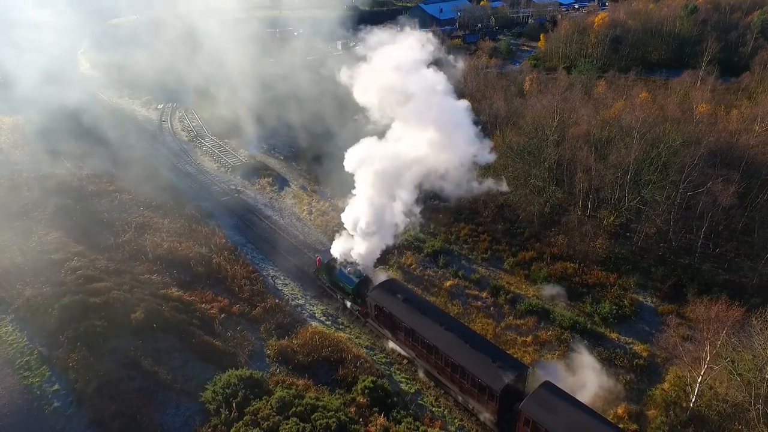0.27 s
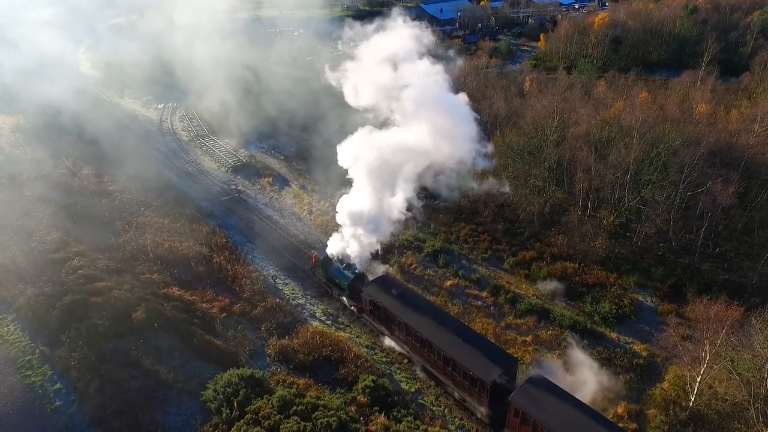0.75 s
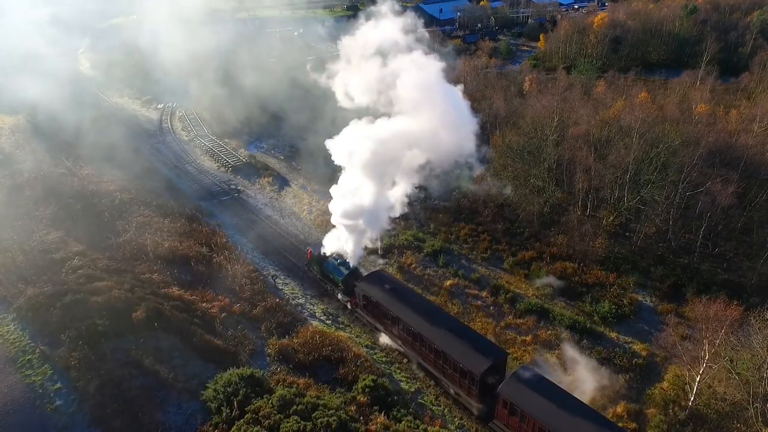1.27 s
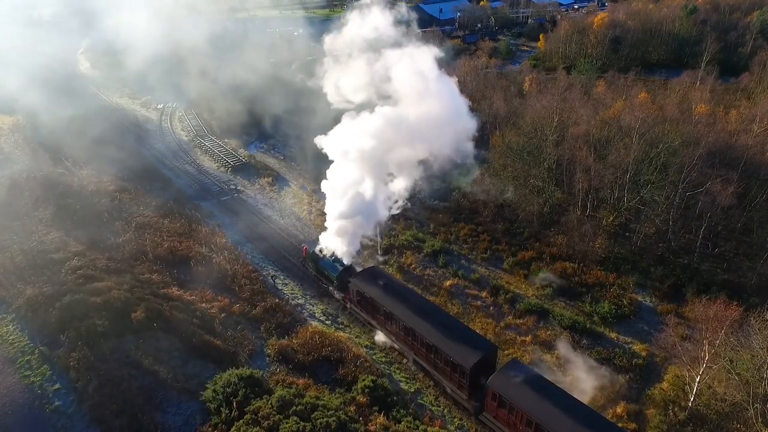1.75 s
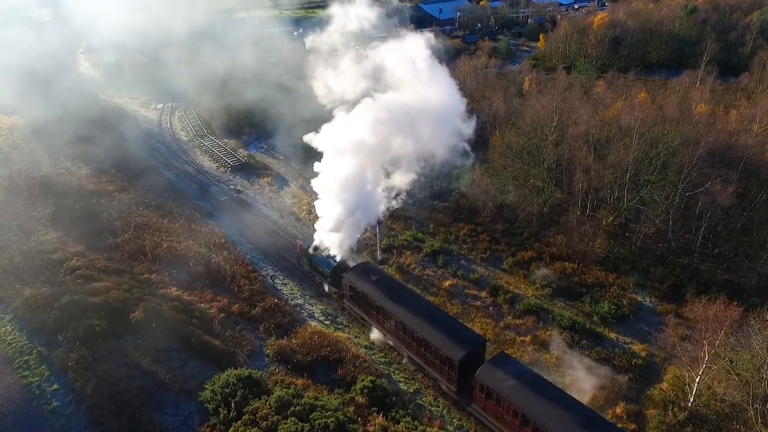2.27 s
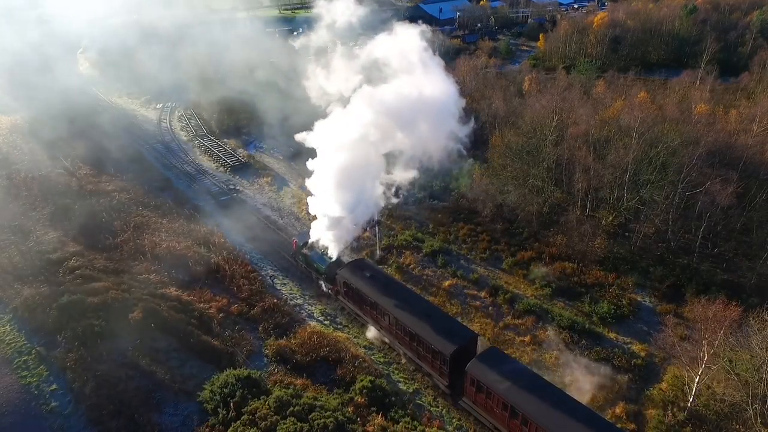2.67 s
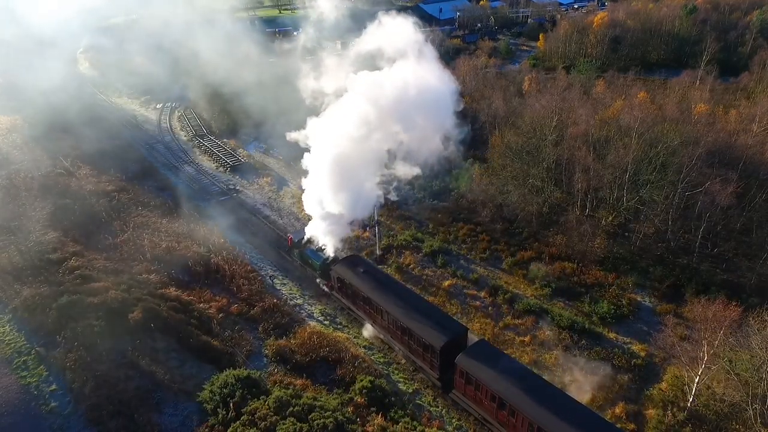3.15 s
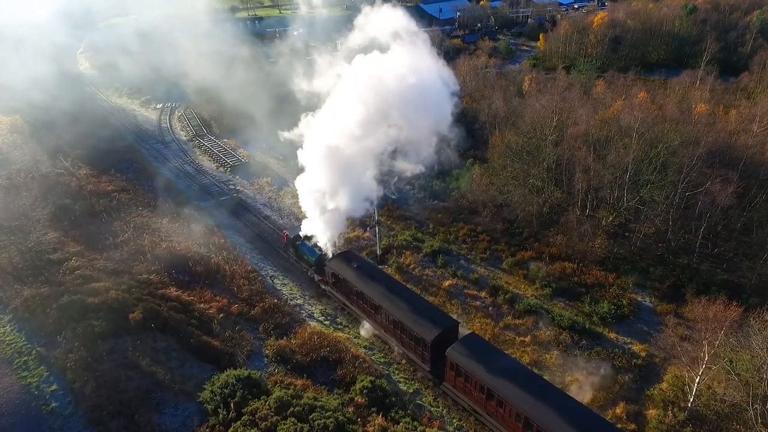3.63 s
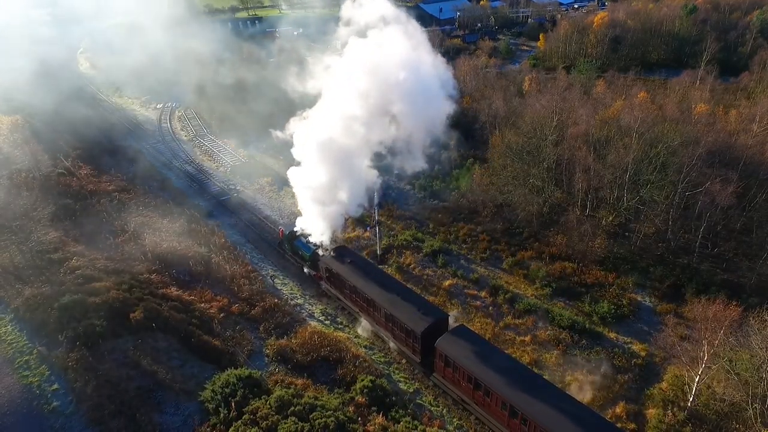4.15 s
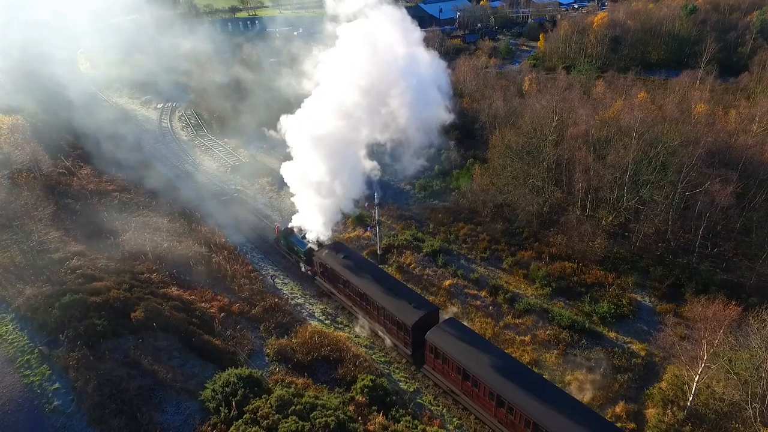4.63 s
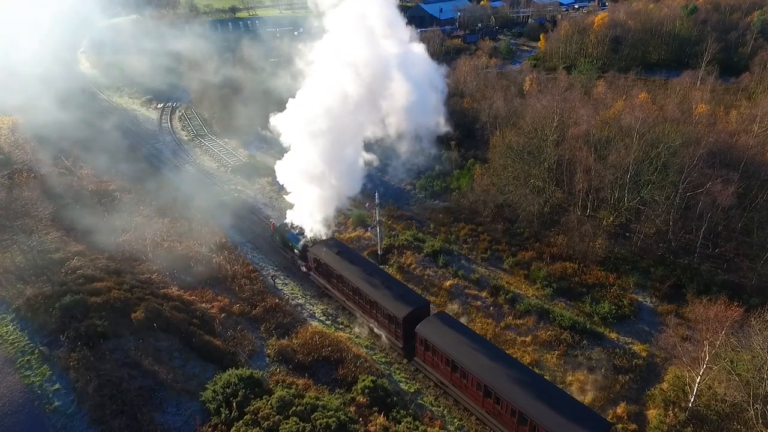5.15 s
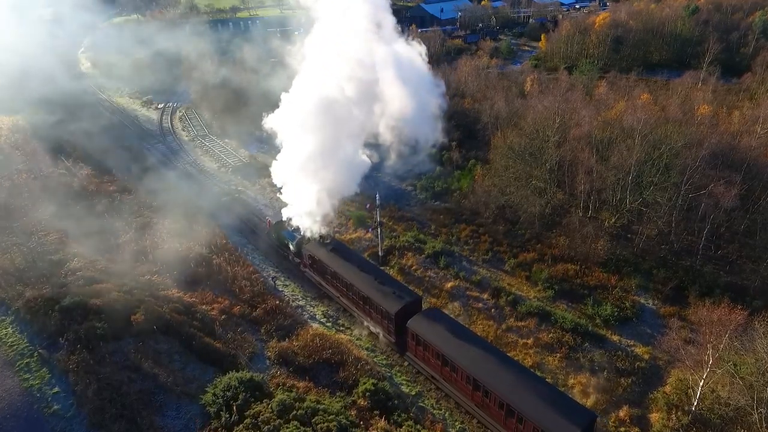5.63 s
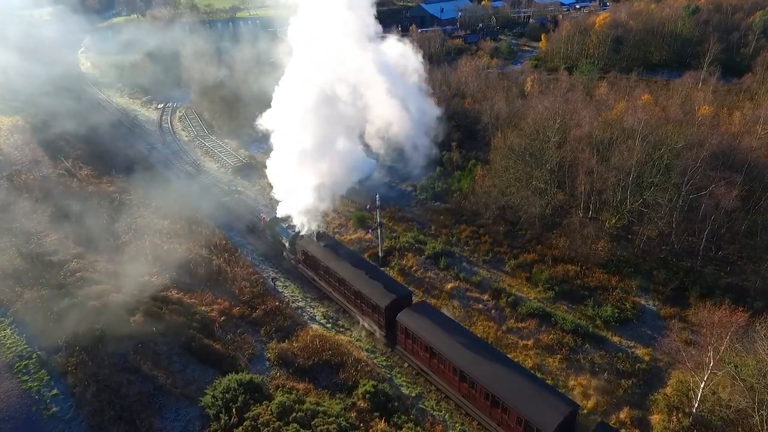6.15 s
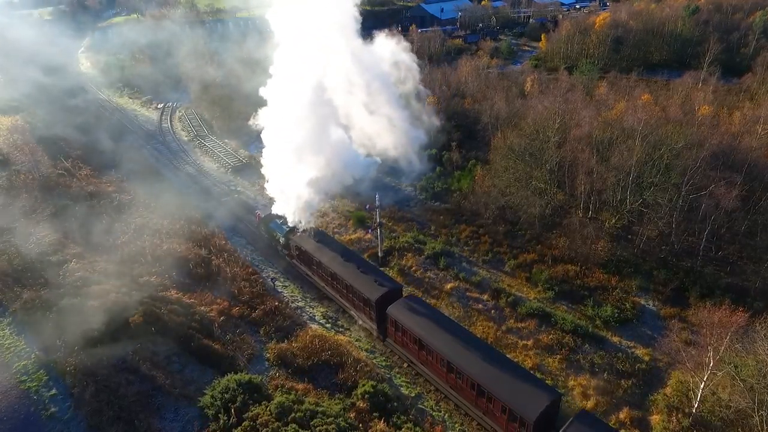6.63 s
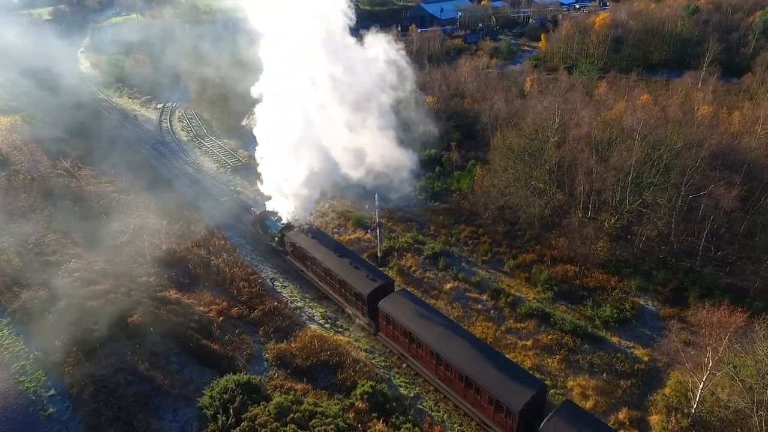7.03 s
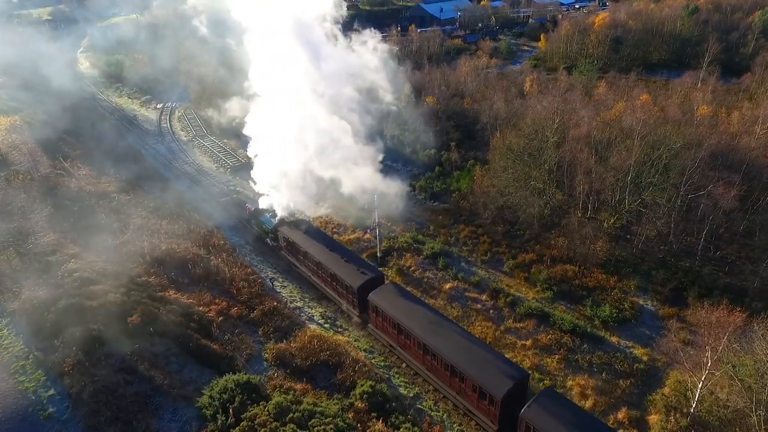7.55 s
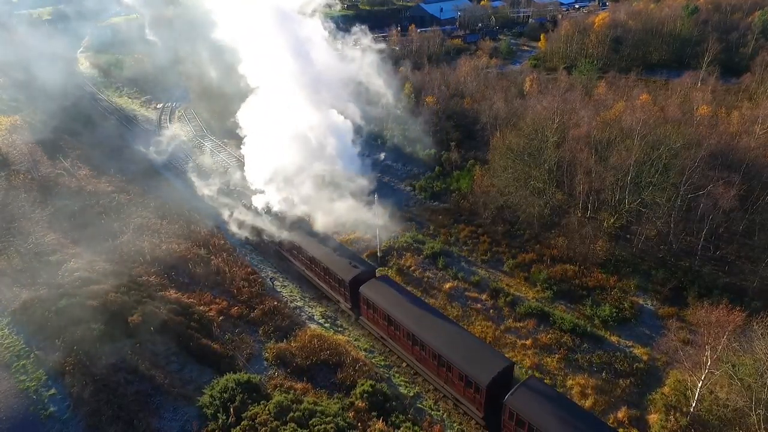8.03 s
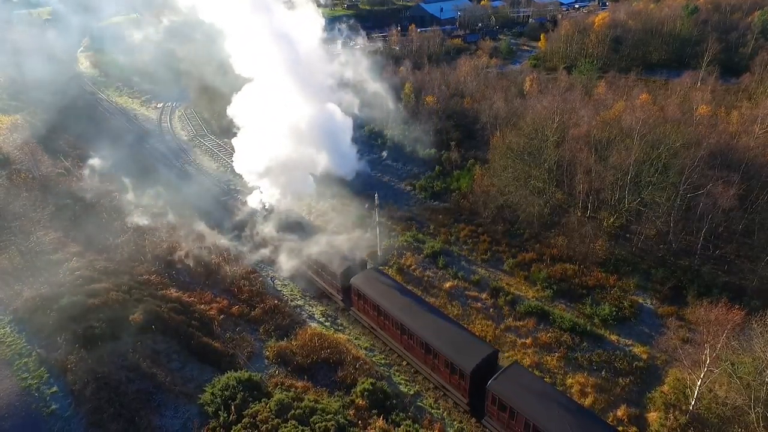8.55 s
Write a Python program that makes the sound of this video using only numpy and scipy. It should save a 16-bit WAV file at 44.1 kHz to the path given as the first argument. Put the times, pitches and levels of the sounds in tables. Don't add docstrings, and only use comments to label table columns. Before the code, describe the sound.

A steam locomotive chuffs in deep, husky beats that quicken gradually and soften, over low rolling rumble, faint whistling steam hiss and occasional dull metal knocks.

```python
import sys
import numpy as np
from scipy import signal
from scipy.io import wavfile
from scipy.ndimage import uniform_filter1d, map_coordinates

SR = 44100
rng = np.random.default_rng(int(sys.argv[2]) if len(sys.argv) > 2 else 0)


def magnitude_from_level(level_db):
    exponent = np.asarray(level_db, float) / 20
    return 10 ** exponent


def file_out(sig):
    cols = np.atleast_2d(sig).T
    lim = np.clip(cols, -1, 1)
    pcm = np.round(lim * 32767).astype(np.int16)
    wavfile.write(sys.argv[1], SR, pcm)


N = 387638

# (valve opens t/s, dying time/s, first chimney mode level/dB, second mode level/dB, bark level/dB)
BEATS = [(0.362, 0.073, -18, -22, -18), (.834, .11, -18.5, -20.5, -22.5), (1.346, .1, -17.5, -17, -20.5),
         (1.805, 0.093, -21, -21, -22.5), (2.266, 0.074, -16.5, -19, -19), (2.678, 0.11, -20.5, -19.5, -21),
         (3.14, 0.13, -20, -24, -19), (3.552, 0.088, -22, -22.5, -21), (3.981, 0.093, -18.5, -22, -15.5),
         (4.359, 0.085, -18.5, -21.5, -18.5), (4.779, 0.1, -16.5, -21, -18),
         (5.164, 0.082, -17.5, -39, -19.5), (5.549, 0.086, -19.5, -22, -17.5), (5.9, 0.08, -16.5, -19, -21),
         (6.284, 0.081, -21.5, -20, -21), (6.635, .08, -21, -21, -23), (7.002, 0.084, -20, -18, -21.5),
         (7.329, 0.076, -21, -19.5, -23.5), (7.688, 0.097, -23, -20.5, -21),
         (8.028, 0.086, -25.5, -22, -22.5), (8.364, 0.088, -23, -22.5, -22),
         (8.681, 0.072, -25, -25, -23.5)]


def rms_one(x):
    return x / np.sqrt(np.mean(x ** 2) + 1e-20)


def in_time(rows, t):
    s, *columns = np.transpose(rows)
    return [np.interp(t, s, c) for c in columns]


def at_hz(points, hz):
    f, db = np.transpose(points)
    return np.interp(np.log(hz + 1), np.log(f), db)


def resonate(x, hz, width_hz):
    r = np.exp(-np.pi * width_hz / SR)
    zeros = np.array([1, 0, -1]) * (1 - r * r) / 2
    return signal.lfilter(zeros, [1, -2 * r * np.cos(2 * np.pi * hz / SR), r * r], x)


def body(x, modes, even):
    y = 0
    for hz, width_hz, db in modes:
        once = resonate(x, hz, 1.42 * width_hz)
        y = y + magnitude_from_level(db) * resonate(once, hz, 1.42 * width_hz)
    power = uniform_filter1d(uniform_filter1d(y ** 2, size=1300), size=1300)
    return rms_one(y / (power + 1e-12) ** (even / 2))


def patches(shape, cells, depth_db):
    grid = rng.standard_normal(cells)
    axes = [np.linspace(0, c - 1, n) for c, n in zip(cells, shape)]
    return depth_db * map_coordinates(grid, np.meshgrid(*axes, indexing="ij"), order=1)


def coloured(gain_db):
    hz, s, z = signal.stft(rng.standard_normal(N), SR, nperseg=2048)
    return signal.istft(z * magnitude_from_level(gain_db(hz[:, None], s[None, :])), SR, nperseg=2048)[1][:N]


def steam():
    # (f/Hz, density level/dB)
    hiss = [(560, -15.5), (950, -12.5), (1160, -7.5), (1700, -2), (1920, -6.5), (2200, -4.5), (2480, -10.5),
            (3520, -13.5), (5180, -21), (12600, -36), (15500, -38.5)]
    # (t/s, level/dB, brightness above 7 kHz/dB per octave)
    leak = [(0.0, -36, -0.5), (1.3, -36, 0.5), (2.13, -36, -1), (2.96, -35, -0.7), (3.89, -37.5, 7.7),
            (4.53, -36.5, 3), (5.14, -37, 3.3), (6.22, -36.5, 2.5), (6.73, -38.5, 3), (7.25, -35.5, -3),
            (7.49, -36, -5), (8.79, -36.5, -6)]
    # (middle t/s, length/s, f/Hz, width/Hz, level/dB)
    whistles = [(1.5, 0.79, 1170, 71, 3.5), (3.6, 12, 1338, 77, 3.5), (3.3, 1.4, 1720, 60, 3.5),
                (7.5, 1.7, 2100, 44, 6), (2.8, 1.2, 1890, 37, -9), (3.2, 1.1, 2680, 97, 6),
                (9, 4.5, 2720, 90, 5), (4.28, 1.2, 3160, 340, 5.5), (6.76, 1.05, 3290, 270, 7.5),
                (7.12, 0.8, 3750, 240, 6.5), (8.3, 0.44, 3510, 260, 7), (6.95, 0.78, 5800, 770, 5.5),
                (3.5, 0.66, 4600, 360, 3.5), (4.92, 0.76, 4800, 320, 7.5), (9.2, 2.1, 5500, 100, -6.5),
                (1.3, 1, 6000, 160, 4.5), (4.57, 0.47, 6110, 130, 9), (8.17, 0.57, 5870, 370, 7),
                (4.6, 1.9, 7250, 180, 5.5), (8.33, 0.32, 6900, 430, 8), (2.12, 0.42, 9700, 420, 7.5),
                (4.22, 0.39, 11000, 280, 8), (2.0, 0.54, 13700, 600, 11), (4.53, 0.16, 8600, 300, 7)]
    # (middle t/s, length/s, level/dB)
    valve = [
        (0.83, 0.86, 3.5),
        (2.75, 0.46, 7.5),
        (4.1, 0.89, 7.5),
        (6.2, 1.22, 8),
        (7.95, 0.74, 7),
    ]
    valve_hz, valve_width_hz = 2206, 66
    singing = [(middle, length, valve_hz, valve_width_hz, db) for middle, length, db in valve]

    def gain_db(hz, s):
        level_db, bright_db = in_time(leak, s)
        out = at_hz(hiss, hz) + level_db - level_db.mean()
        out = out + bright_db * np.log2(np.maximum(hz / 7000, 1))
        flutter = 1 + patches(out.shape, (50, 110), depth_db=0.23)
        for middle, length, top_hz, width_hz, db in [*whistles, *singing]:
            away = ((s - middle) / length) ** 4 + abs((hz - top_hz) / width_hz) ** 3
            out = out + db * flutter * np.exp(-away)
        high = np.clip((hz - 2500) / 1500, .25, 1)
        out = out + high * patches(out.shape, (110, 20), depth_db=3.5)
        return out + patches(out.shape, (40, 90), depth_db=1.22)
    return magnitude_from_level(-38.5) * rms_one(coloured(gain_db))


def rolling():
    # (t/s, rumble level/dB)
    rumble = [(0.0, -42.5), (0.49, -44.5), (0.64, -47.5), (0.88, -57), (0.98, -48.5), (2.25, -47),
              (2.4, -50.5), (3.18, -51), (3.28, -42.5), (4.36, -49.5), (5.09, -42.5), (5.7, -50.5),
              (6.49, -42.5), (7.74, -47), (8.37, -41.5), (8.79, -47)]
    # (f/Hz, density level/dB)
    colour = [(22, 1), (40, -12), (70, 9.5), (110, 8.5), (190, 8.5), (300, 6.5), (450, -2), (700, -5.5),
              (1000, -6), (1500, -40.5)]
    upper_db, upper_follows = -39, 0.29

    def gain_db(hz, s):
        deep, = in_time(rumble, s)
        upper = upper_db + upper_follows * (deep - deep.mean())
        share = np.clip(np.log(hz / 250 + 1e-9) / np.log(1.6), 0, 1)
        return at_hz(colour, hz) + (1 - share) * deep + share * upper
    return magnitude_from_level(13.0) * coloured(gain_db)


def surroundings():
    # (f/Hz, density level/dB)
    air = [(25, -30), (60, -13), (170, -10), (450, -12), (800, -10.5), (1050, -11), (2000, -13),
           (3600, -17), (6000, -21.5), (9000, -26), (12000, -32), (13500, -31), (15500, -44)]
    # (f/Hz, width/Hz, level/dB)
    air_modes = [(520, 50, 11.5), (635, 20, 15), (700, 25, 16), (880, 25, 2), (1320, 25, 5),
                 (1480, 110, -16), (1720, 85, 11), (2230, 90, 11), (2740, 80, 2), (3030, 80, 3),
                 (6000, 200, -5)]

    def gain_db(hz, s):
        out = at_hz(air, hz)
        for top_hz, width_hz, db in air_modes:
            out = out + db * np.exp(-((hz - top_hz) / width_hz) ** 2)
        return out + patches((len(hz), s.size), (60, 12), depth_db=-2.5)
    return magnitude_from_level(-50.5) * rms_one(coloured(gain_db)) * [[1], [-1]]


def smokebox(t):
    # (peak level/dB, lag/s, half length/s)
    swells = [(-46, .001, .05), (-49, 0.21, .07), (-45.5, 0.18, 0.11), (-48, 0.16, 0.065), (-43, 0.18, .1),
              (-42, 0.16, 0.13), (-56, .1, .15), (-48, 0.12, .12), (-39, 0.19, 0.11), (-39.5, 0.18, 0.098),
              (-45.5, 0.19, 0.11), (-39, 0.16, 0.096), (-46, .18, .07), (-43.5, 0.18, 0.11),
              (-45, .21, 0.12), (-42, 0.19, .06), (-42.5, .18, 0.14), (-45, 0.22, 0.15), (-65, 0.11, .12),
              (-42, 0.18, 0.15), (-48, 0.28, 0.18), (-67, 0.27, 0.098), (-50, 0.072, 0.067)]
    smokebox_hz, rest_db, fall_db = 54.5, -69, 7.5
    wander = np.interp(t, np.linspace(0, t[-1], num=90), rng.standard_normal(size=90))
    phase = 2 * np.pi * np.cumsum(smokebox_hz * (1 + .055 * wander)) / SR
    level = magnitude_from_level(rest_db)
    for opens_s, (db, lag_s, half_s) in zip([0] + [b[0] for b in BEATS], swells):
        level = level + magnitude_from_level(db - fall_db * ((t - opens_s - lag_s) / half_s) ** 2)
    return np.sqrt(2) * level * np.sin(phase)


def knocks():
    # (t/s, peak level/dB, f/Hz, ring/s)
    blows = [(.002, -34, 260, 0.0032), (.109, -27.5, 266, 0.0028), (.143, -30, 477, 0.0019),
             (0.193, -23.5, 450, 0.0022), (0.194, -26, 180, 0.0041), (0.205, -29, 230, 0.0026),
             (.551, -24, 232, 0.0015), (1.157, -26.5, 140, 0.0032), (1.184, -26, 470, 0.0022),
             (1.197, -32, 410, 0.0032), (1.208, -33, 427, 0.002), (2.088, -32, 210, 0.0054),
             (2.137, -34, 317, 0.0094)]
    out, u = np.zeros(N), np.arange(2000) / SR
    for s, db, hz, ring_s in blows:
        ring = (u / ring_s) * np.exp(1 - u / ring_s)
        out[round(s * SR):][:len(u)] += magnitude_from_level(db) * np.sin(2 * np.pi * hz * u) * ring
    return out


def clatter(t):
    # (middle t/s, length/s, rms level/dB, f/Hz)
    rattles = [
        (0.168, 0.028, -42, 438),
        (1.19, .025, -45, 600),
        (1.516, 0.02, -38, 700),
        (4.953, 0.032, -37, 475),
        (6.446, 0.037, -33, 577),
        (6.455, 0.03, -31.5, 307),
        (6.516, .03, -44, 440),
        (7.308, 0.026, -35, 610),
        (7.838, 0.014, -36.5, 700),
        (7.84, .02, -39, 300),
    ]
    noise, out = rng.standard_normal(N), np.zeros(N)
    for s, length, db, hz in rattles:
        rattle = body(noise, [(hz, 0.31 * hz, 0)], even=0.57)
        out += magnitude_from_level(db) * np.exp(-((t - s) / length) ** 4) * rattle
    return out


def gust(t, opens_s, build, dying_s, peak_db, shape):
    peak_s, rise_db, fall_db, bend = shape
    peak_s = peak_s * build
    after = t - opens_s - peak_s
    rise = rise_db * (np.minimum(after, 0) / peak_s) ** 2
    fall = fall_db * (np.maximum(after, 0) / dying_s) ** bend
    return magnitude_from_level(peak_db - rise - fall)


def exhaust(t):
    # (f/Hz, width/Hz, level/dB)
    chimney_low = [(203, 30, 0), (168, 40, -16), (110, 70, -30)]
    chimney_second = [(272, 24, 0), (320, 50, -5)]
    bark_modes = [(378.7, 109, 9.5), (455, 150, -8), (620, 61, -10.5)]
    rasp_modes = [(950, 450, 0), (1500, 600, -3), (2100, 600, -9)]
    # (build-up re usual [ratio], rasp re usual level/dB, first mode ring-on [ratio])
    strokes = [(1.28, 0.5, 0.91), (0.97, -2, 1.16), (1.2, 3.5, 1.06), (0.92, .1, 1.15), (1.08, 0, 1.06),
               (1.08, 1, 1.13), (1.1, 0, 0.91), (1.1, 0, 0.97), (0.78, -0.5, 1.16), (1.04, -2, 1.12),
               (0.94, 1, 0.97), (0.85, -3, 1.17), (0.92, -5, 1.12), (1.1, -2, 0.86), (1.13, .5, 1.24),
               (1.03, -2, 1.05), (0.94, 2.5, 0.81), (1.18, 1.5, 1), (1.12, 2, 0.92), (0.94, 2, 0.89),
               (1.09, 1, 1.1), (1.1, 4, 0.86)]
    # (time to peak/s, rise from opening/dB, fall after the dying time/dB, bend of the fall)
    shapes = [(0.052, 15.2, 15.6, 1.85), (0.037, 16, 12, 2.36), (0.046, 18.3, 21.8, 1.78), (0.053, 15.6, 27, 1.16)]
    rasp_mean_db, rasp_follows = -37, 0.4

    puffs_per_s = 900
    strength_db = 3.0 * np.minimum(rng.exponential(1, N), 3)
    puffs = (rng.random(N) < puffs_per_s / SR) * magnitude_from_level(strength_db)
    blast = -rms_one(puffs - puffs.mean()) + 1.22 * rng.standard_normal(N)

    level, mean_bark_db = np.zeros((4, N)), np.mean(BEATS, axis=0)[-1]
    for beat, (build, bite_db, ring_on) in zip(BEATS, strokes):
        opens_s, dying_s, low_db, second_db, bark_db = beat
        on = abs(t - opens_s - .1) < .25
        rasp_db = rasp_mean_db + bite_db + rasp_follows * (bark_db - mean_bark_db)
        peaks_db = (low_db, second_db, bark_db, rasp_db)
        for voice, db, last, shape in zip(level, peaks_db, (ring_on, 1, 1, 1), shapes):
            voice[on] += gust(t[on], opens_s, build, last * dying_s, db, shape)

    low, second, bark, rasp = level
    out = low * body(blast, chimney_low, even=0.52)
    out += second * body(blast, chimney_second, even=0.75)
    out += bark * body(blast, bark_modes[:-1], even=0.48)
    out += rasp * magnitude_from_level(-0.5) * body(blast, bark_modes[-1:], even=0.65)
    out += rasp * body(rng.standard_normal(N), rasp_modes, even=0.72)
    return signal.sosfilt(signal.butter(2, [95, 2600], "band", fs=SR, output="sos"), out)


def woods(x):
    t60_s, echo_db, cut_hz = 0.78, -29.5, 2000
    u = np.arange(SR) / SR
    wash = rng.standard_normal((2, SR)) * magnitude_from_level(-60 * u / t60_s) * (1 - np.exp(-u / 0.033))
    wash = signal.sosfilt(signal.butter(1, cut_hz, fs=SR, output="sos"), wash)
    middle, side = wash
    sides = (middle + 0.069 * side * [[1], [-1]]) / np.sqrt(np.sum(middle ** 2))
    return magnitude_from_level(echo_db) * signal.fftconvolve(x[None], sides, axes=1)[:, :N]


def scene():
    # (t/s, left minus right level/dB)
    direction = [
        (0, -1.93),
        (4.5, -1.34),
        (8.79, -.5),
    ]
    t = np.arange(N) / SR
    beats = exhaust(t)
    train = beats + knocks() + clatter(t) + rolling() + steam() + woods(beats)
    pan_db = in_time(direction, t)[0] / 2 * [[1], [-1]]
    return train * magnitude_from_level(pan_db) + smokebox(t) + surroundings()


def band_limit(x):
    return signal.sosfilt(signal.butter(12, 15690, fs=SR, output="sos"), x)


def record(dry):
    return band_limit(1.412 * np.tanh(dry / 1.203))


dry = scene()
out = record(dry)
file_out(out)
```